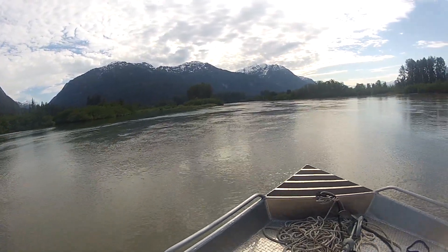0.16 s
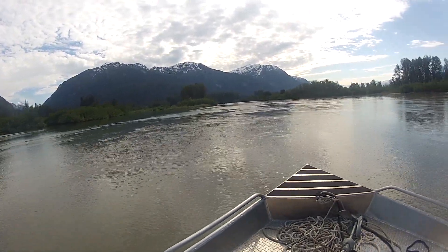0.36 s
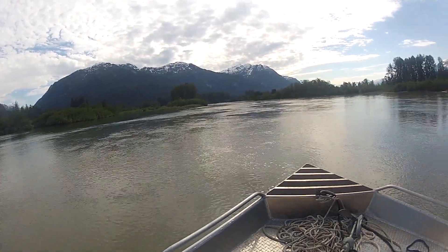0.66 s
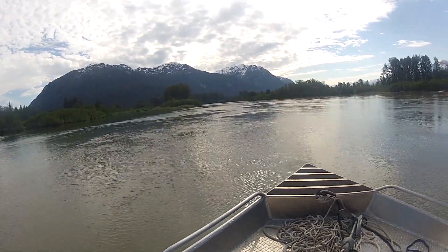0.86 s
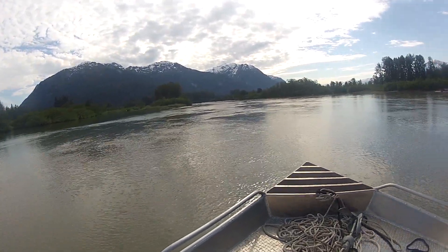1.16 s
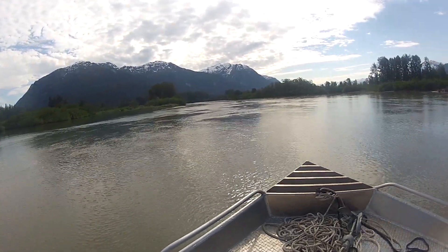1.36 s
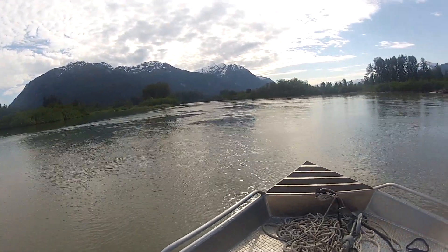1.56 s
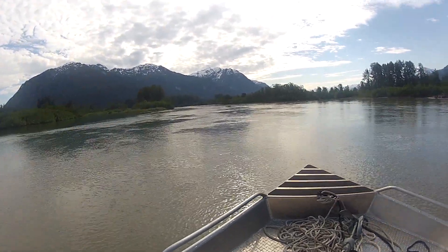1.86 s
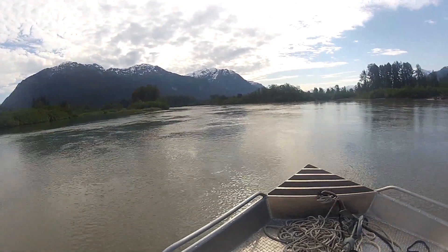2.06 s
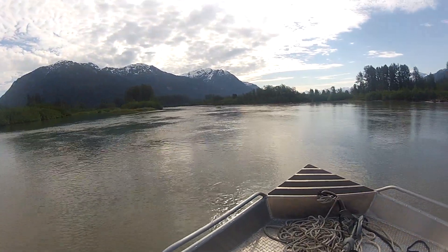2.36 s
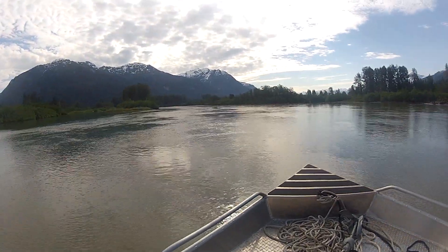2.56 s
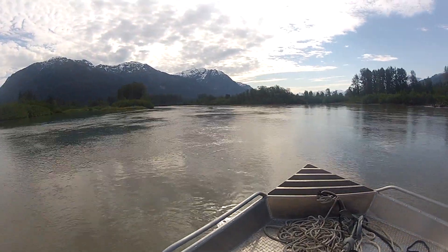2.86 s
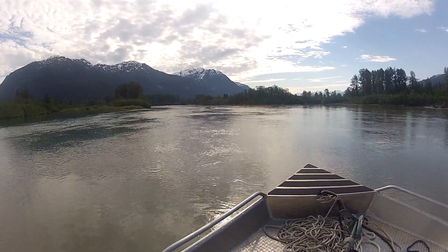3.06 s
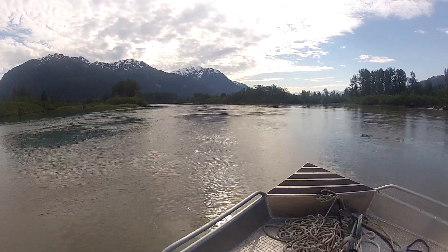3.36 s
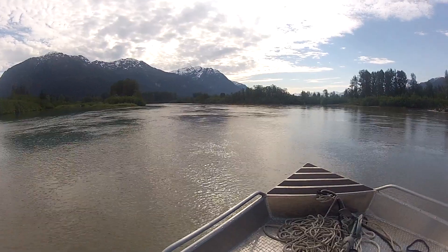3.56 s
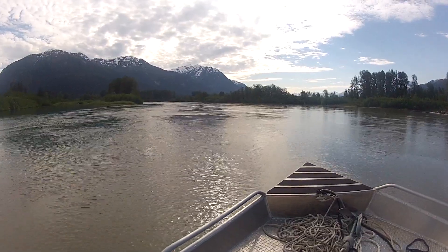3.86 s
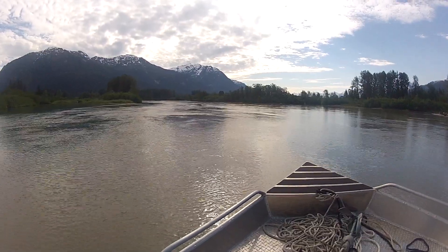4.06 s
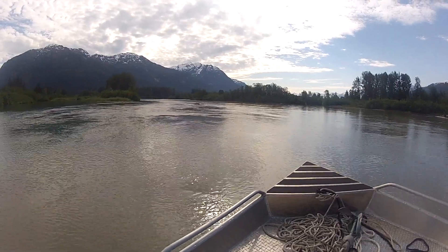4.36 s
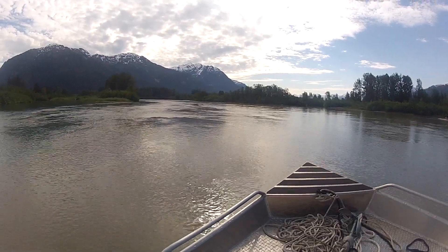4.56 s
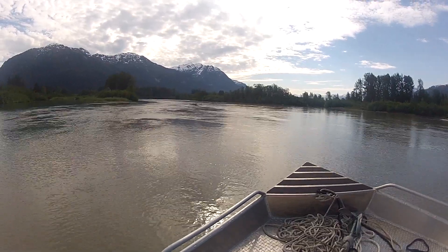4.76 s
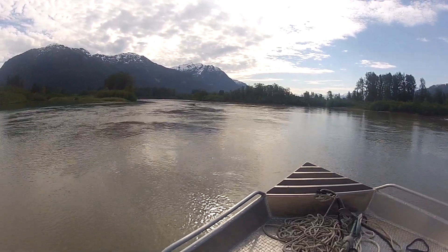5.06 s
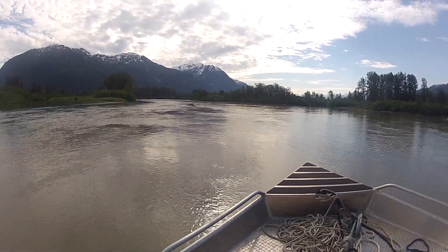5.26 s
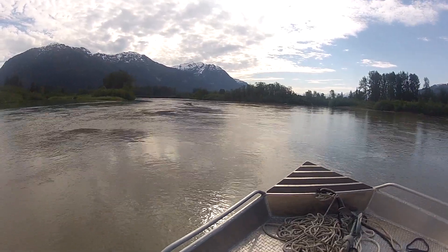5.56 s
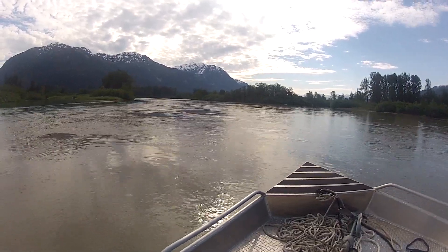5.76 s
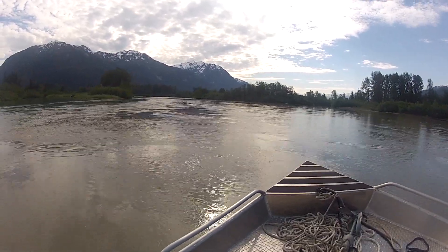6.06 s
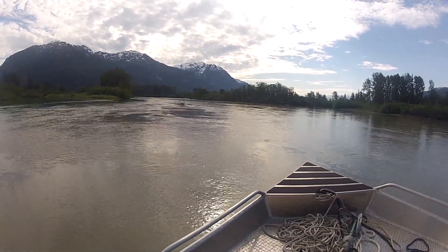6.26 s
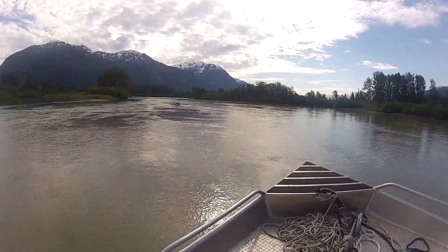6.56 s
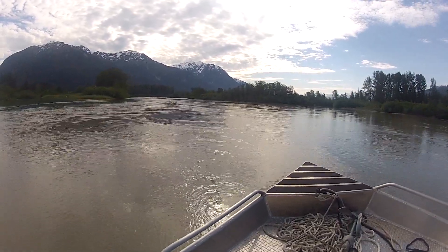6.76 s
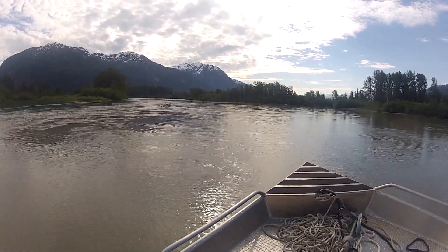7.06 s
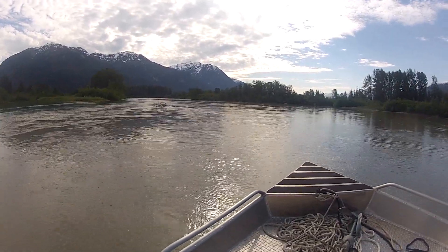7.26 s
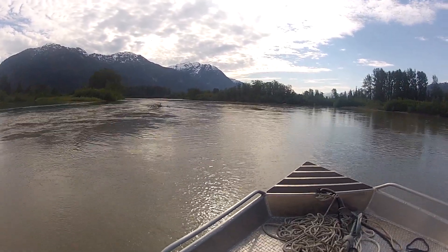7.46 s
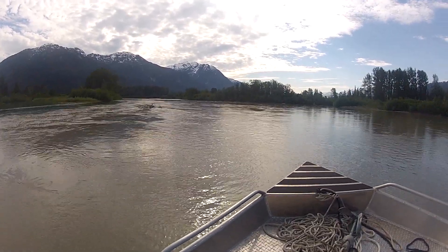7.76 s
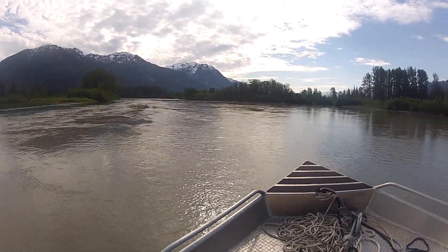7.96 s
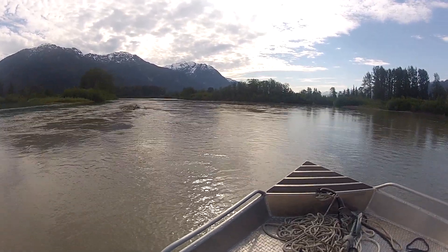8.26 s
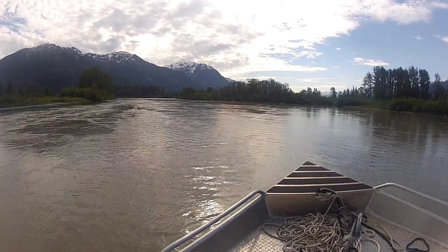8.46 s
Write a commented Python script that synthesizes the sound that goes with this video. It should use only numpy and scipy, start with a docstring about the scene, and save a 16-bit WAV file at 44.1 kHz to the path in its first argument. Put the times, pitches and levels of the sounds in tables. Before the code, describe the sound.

Motorboat cruising a wide river: deep buzzing engine hum, rumbling metal hull, hissing water bursts, occasional slaps, muffled wind, gritty lo-fi treble.

```python
"""An engine drone fills an aluminium jet boat at steady cruise, heard from a small cased camera in the bow.
The drone sums shaft orders, some swelling one by one; noise rings the hull panels under it.
Spray, wash and mist are grainy noises that surge together and burst as the bow lands; waves slap the hull.
Low wind noise buffets the case. A slow converter holds each sample, mirroring the sound into the treble."""
import sys
import numpy as np
from scipy import signal
from scipy.fft import rfft, irfft
from scipy.io import wavfile
from scipy.ndimage import uniform_filter1d

SR = 44100
rng = np.random.default_rng(int(sys.argv[2]) if len(sys.argv) > 2 else 0)


def natural_amplitude(level_db):
    """Convert a level in decibels to a linear amplitude factor, elementwise."""
    exponent = np.asarray(level_db, float) / 20
    return 10 ** exponent


def dump(signal):
    """Clip the signal to [-1, 1] and save it as 16-bit WAV at the path in sys.argv[1]."""
    limited = np.clip(np.atleast_2d(signal).T, -1, 1)
    pcm = np.round(limited * 32767).astype(np.int16)
    wavfile.write(sys.argv[1], SR, pcm)


N = 380583  # samples

# shaft speed: time_s, speed_hz
SHAFT_SPEED = [(0, 34.89), (1.5, 34.82), (3.2, 34.8), (3.7, 34.94), (5.5, 35.0), (8.63, 34.94)]
# orders without swells: multiple_of_shaft_speed, level_db
STEADY_ORDERS = [(2, -48.5), (5, -30.5), (9, -50.5), (26, -68.5), (40, -65)]
# orders that swell and fade: multiple_of_shaft_speed, mid_run_level_db, drift_db_per_s
WAVERING_ORDERS = [(1, -43.5, 1.1), (3, -33, -0.35), (4, -27, 0.), (6, -33, 0.), (7, -33, 0.24),
                   (8, -34, 0.), (10, -49.5, 0.), (11, -51.5, 0.), (12, -51, 0.14), (17, -59.5, 0),
                   (18, -56.5, 0.)]
# swells of single orders as the hull rides the water: multiple_of_shaft_speed, start_s, length_s, change_db
ORDER_SWELLS = [(4, -.2, 0.56, 3.5), (4, 1.3, .9, -11.5), (4, 3, .3, 2.5), (4, 6, 0.27, -5),
                (4, 4.5, 0.93, 4), (4, 5.55, 1.12, -12), (4, 6.6, 0.7, -7), (4, 7.28, 0.37, 3),
                (4, 8, .9, -12.5), (3, -0.13, 3.07, 4), (3, 4.5, 0.56, -6), (3, 4, 0.59, 4),
                (3, 8.5, .35, 4), (6, -0.15, 2.0, -4.5), (6, .85, 0.21, -6), (6, 2, 0.43, 4.5),
                (6, 3.0, 1.32, 4.5), (6, 7.5, .2, -7), (6, 8.0, .7, -10), (7, 1, 0.43, -4),
                (7, 2.5, 0.21, -8), (7, 3.9, 0.27, 4.5), (7, 4.5, 0.2, -8), (7, 5, 0.45, 4),
                (7, 6, .25, -4), (7, 8, 0.45, 3.5), (8, 1.95, 0.48, -7), (8, 3, .9, -6),
                (8, 4.5, 0.99, 2.5), (8, 5.5, .5, -4.5), (8, 7, 0.68, -9), (10, 1.38, 1.5, 6.5),
                (10, 5.3, 0.74, 4), (10, 3, 0.41, -6), (10, 3.38, 0.56, 8), (10, 6, 0.56, -6),
                (11, 2.5, 1.6, -10), (12, 0.6, 2.74, -6.5), (12, 3.5, 1.05, 4.5), (17, 4.5, 3.0, -5),
                (17, 7.5, .8, 6), (18, 7.7, 1.0, 3.5), (17, -0.5, .8, 2.5), (18, 2.0, 2.5, -7),
                (18, -0.3, 0.97, 5)]
# panels that delay the beat: resonance_hz, width_hz
DELAY_PANELS = [(98, 18), (228, 6), (272, 20), (300, 10)]
# hull panels rung by turbulence: resonance_hz, width_hz, level_db
HULL_PANELS = [(95.7, 24.5, -33.5), (165, 67, -39), (235, 36, -35), (349, 94, -50.5), (620, 70, -56),
               (925, 92, -54)]
# how much water flies: time_s, spray_db, mist_db (mist before MIST_GAIN_DB)
WATER_LEVELS = [(0, -49.5, -51.5), (.25, -47, -55.5), (.7, -45, -53.5), (1.4, -43.5, -59.5),
                (1.7, -40.5, -56.5), (2.3, -41, -56), (3.1, -43.5, -56.5), (3.9, -44, -53.5),
                (4.5, -43.5, -52), (5.3, -47, -52.5), (5.8, -41, -56), (6.4, -40, -56.5), (6.8, -37, -55.5),
                (7.25, -37, -55.5), (7.6, -44, -55.5), (7.8, -38, -57), (8.14, -40.5, -61),
                (8.3, -45.5, -60.5), (8.63, -42, -57.5)]
# camera case cavities colouring the spray: resonance_hz, width_hz, relative_level_db
CASE_CAVITIES = [(2167, 490, -3), (2606, 485, 0), (3210, 135, -5)]
# wash spectrum: frequency_hz, relative_density_db
WASH_SPECTRUM = [(300, -19), (420, -8.5), (512, -8), (618, -5), (950, -4), (1160, -9), (1700, -8),
                 (2600, -18.5), (4000, -48)]
# mist spectrum: frequency_hz, relative_density_db
MIST_SPECTRUM = [(600, -33), (1300, -5.5), (2200, 0), (3200, -8.5), (3550, -7), (5220, -13.5),
                 (5900, -24.5), (7000, -50)]
# bow lifts, then lands: landing_s, lift_s, lift_change_db, burst_db
BOW_LANDINGS = [(.29, 0.087, -4, 1.5), (1.52, 0.11, -2.5, 1), (.94, .04, 0, 4), (1.097, 0.096, -5.5, 10.5),
                (1.9, 0.14, -2, 1.5), (2.19, 0.055, -0.5, 6), (2.52, .07, 3.5, 2.5), (2.81, .04, -0.5, 2),
                (3.05, 0.096, -3.5, 3), (3.46, 0.13, -2, 5), (3.7, 0.092, -3.5, 2), (3.77, 0.034, -2, 2),
                (3.92, 0.081, -1, 3.5), (4.4, 0.078, -3.5, 3), (4.76, 0.14, -2, 1), (5.17, .06, -2, 4.5),
                (5.53, 0.057, -0.5, 1.5), (5.878, 0.071, -6.5, 0), (6.12, .05, -3, 5), (6.25, .06, -3, 0.5),
                (6.68, .04, -2, 1.5), (7.01, 0.085, -3, 2.5), (7.35, .06, -3.5, 0.5),
                (7.72, 0.059, -0.5, 1), (8.32, 0.13, -4.5, .5), (8.47, 0.11, -2, 3)]
# waves slapping the hull: start_s, thud_peak_db, thud_hz, splash_start_db
WAVE_SLAPS = [(1.099, -23, 110, -36), (1.758, -9, 103.6, -50), (5.879, -32, 110, -44),
              (6.107, -22, 120, -43.5)]
# wind gusts and lulls: start_s, length_s, change_db
WIND_GUSTS = [(1.25, .4, 5.5), (4.1, 1.6, 6), (5.2, 0.76, 2.5), (1.9, 0.37, 4), (6.35, .2, -10),
              (7.85, .15, 7), (8.2, .2, 2)]

SWELL_EDGE_S, WAVER_DB = 0.14, 0.6
CHURN_ABOVE_HZ, CHURN_DB_PER_MIST_DB = 800, 0.87
MIST_REF_DB, MIST_GAIN_DB = -55, 9.5
WASH_AT_REF_DB, WASH_DB_PER_MIST_DB = -44.5, 0.72
BURST_DECAY_S, LANDING_SMOOTH_S, CHOP_DB = 0.059, 0.0052, 0.75
WIND_DB, GUST_EDGE_S = -40, 0.15


def engine():
    """Shaft orders locked into one beat a turn; uneven combustion makes each flutter in level and phase."""
    speed_hz, = curves(SHAFT_SPEED)
    turn_rad = 2 * np.pi * np.cumsum(speed_hz) / SR + 0.054 * walk(8)
    orders = [(row[0], order_db(*row)) for row in WAVERING_ORDERS] + STEADY_ORDERS
    drone = 0
    for k, level_db in orders:
        slip_rad = 0.02 * k * walk(12) + 0.2 * walk(1.48)
        flutter_db = (0.4 + 0.1 * k) * walk(12)
        wave = np.sqrt(2) * np.cos(k * turn_rad - panel_lag_rad(k) + slip_rad)
        drone = drone + natural_amplitude(level_db + flutter_db) * wave
    return drone, turn_rad


def panel_lag_rad(k):
    """An order lags by up to half a cycle for each panel resonance that it lies above."""
    hz = k * SHAFT_SPEED[0][1]
    return sum(np.arctan2(width_hz * hz, panel_hz ** 2 - hz ** 2) for panel_hz, width_hz in DELAY_PANELS) - 0.7


def order_db(k, mid_run_db, drift_db_per_s):
    """Level of one order: a drift, its swells and a slow waver."""
    swells = [row[1:] for row in ORDER_SWELLS if round(row[0]) == round(k)]
    drift_db = drift_db_per_s * (np.arange(N) - N / 2) / SR
    return mid_run_db + drift_db + bumps(swells, SWELL_EDGE_S) + WAVER_DB * walk(3.5)


def hull():
    """Water rushing under the bottom shakes the panels at random; upper ones ring harder as mist grows."""
    mist_db = curves(WATER_LEVELS)[1]
    churn_db = CHURN_DB_PER_MIST_DB * (mist_db - MIST_REF_DB)
    total = 0
    for hz, width_hz, level_db in HULL_PANELS:
        panel_db = level_db + 1.4 * walk(1.95) + churn_db * (hz > CHURN_ABOVE_HZ)
        total = total + natural_amplitude(panel_db) * ring_twice(rng.standard_normal(N), hz, width_hz)
    return total


def water(turn_rad):
    """Spray, wash and mist surge together and throb once a shaft turn."""
    spray_db, mist_db = curves(WATER_LEVELS)
    wash_db = WASH_AT_REF_DB + WASH_DB_PER_MIST_DB * (mist_db - MIST_REF_DB)
    quick_db = landings_db()
    surge = natural_amplitude(0.5 * walk(25) + 0.5 * walk(70) + 0.37 * np.sin(turn_rad))
    wash, mist = droplets(1.3, count=2)
    # quick spray surges carry over in part
    wash = natural_amplitude(wash_db + 0.41 * quick_db) * colour(wash, WASH_SPECTRUM)
    mist = natural_amplitude(mist_db + MIST_GAIN_DB + 0.43 * quick_db) * colour(mist, MIST_SPECTRUM)
    return surge * (natural_amplitude(spray_db + quick_db) * spray() + wash + mist)


def spray():
    """Droplet noise rings the case cavities, each wavering in level; rms 1."""
    total = 0
    for grains, (hz, width_hz, level_db) in zip(droplets(1.9, count=len(CASE_CAVITIES)), CASE_CAVITIES):
        total = total + natural_amplitude(level_db + 0.3 * walk(9.9)) * ring_twice(grains, hz, width_hz)
    return unit(total)


def droplets(spread_db, count=1):
    """Noises whose grains differ in size together: now and then a big drop."""
    size_db = spread_db * rng.exponential(size=N // 64 + 1).repeat(64)
    size = natural_amplitude(uniform_filter1d(size_db, size=64)[:N])
    return size * rng.standard_normal((count, N))


def landings_db():
    """Spray level around landings: a shift while the bow lifts, usually down, then a burst that decays."""
    t_s, total_db = np.arange(N) / SR, CHOP_DB * walk(14)
    for land_s, lift_s, lift_change_db, burst_db in BOW_LANDINGS:
        # ramps over the first half of the lift, then holds
        before_db = lift_change_db * np.clip(2 + 2 * (t_s - land_s) / lift_s, 0, 1)
        after_db = burst_db * np.exp(-np.abs(t_s - land_s) / BURST_DECAY_S)
        total_db = total_db + np.where(t_s < land_s, before_db, after_db)
    return uniform_filter1d(total_db, size=int(LANDING_SMOOTH_S * SR))


def slaps():
    """Each wave gives a short hull thud and a decaying burst of splash noise."""
    out, t_s = np.zeros(N), np.arange(SR // 8) / SR
    splash = ring(ring(rng.standard_normal(N), 1800.0, 2400.0), 1800.0, 2400.0)
    for start_s, thud_db, thud_hz, splash_db in WAVE_SLAPS:
        i = int(start_s * SR)
        swing = -np.cos(2 * np.pi * thud_hz * (t_s - 0.015))
        thud = swing * np.exp(-((t_s - 0.017) / 0.0095) ** 2)
        burst = np.exp(-t_s / 0.0051) * splash[i:i + len(t_s)]
        out[i:i + len(t_s)] += natural_amplitude(thud_db) * thud + natural_amplitude(splash_db) * burst
    return out


def wind():
    """Low noise buffets the microphone port, in gusts and lulls."""
    buffet = ring(ring(rng.standard_normal(N), 57.0, 80.0), 55.0, 81.0)
    return natural_amplitude(WIND_DB + bumps(WIND_GUSTS, GUST_EDGE_S) + 0.59 * walk(11)) * buffet


def unit(x):
    """Scale to rms 1."""
    return x / np.sqrt(np.mean(x ** 2))


def walk(rate_hz):
    """Random levels held 1 / rate_hz and slewed twice, then trimmed to N; rms 1."""
    k = int(SR / rate_hz)
    steps = np.repeat(rng.standard_normal(N // k + 1), k)
    return unit(uniform_filter1d(uniform_filter1d(steps, k), k)[:N])


def ring(x, hz, width_hz):
    """One resonance, rms 1."""
    return unit(signal.lfilter(*signal.iirpeak(hz, hz / width_hz, fs=SR), x))


def ring_twice(x, hz, width_hz):
    """Steeper resonance: a second pass at twice the width; rms 1."""
    return ring(ring(x, hz, width_hz), hz, 2 * width_hz)


def colour(x, spectrum):
    """Shape a noise by a spectrum, interpolated over log frequency; rms 1."""
    hz, level_db = np.transpose(spectrum)
    bin_hz = np.maximum(np.fft.rfftfreq(N, 1 / SR), 1)
    gain = natural_amplitude(np.interp(np.log(bin_hz), np.log(hz), level_db))
    return unit(irfft(rfft(x) * gain, N))


def curves(table):
    """Columns of a table at every sample; the first column is time_s."""
    time_s, *columns = np.transpose(table)
    return [np.interp(np.arange(N) / SR, time_s, column) for column in columns]


def bumps(rows, edge_s):
    """Sum of soft-edged plateaus: start_s, length_s, change_db."""
    t_s = np.arange(0, N, 64) / SR
    total_db = np.zeros(len(t_s))
    for start_s, length_s, change_db in rows:
        rise = np.tanh(2 * (t_s - start_s) / edge_s)
        fall = np.tanh(2 * (t_s - start_s - length_s) / edge_s)
        total_db += change_db * (rise - fall) / 2
    return np.interp(np.arange(N) / SR, t_s, total_db)


def scene():
    """Engine, hull, water, slaps and wind at one microphone."""
    drone, turn_rad = engine()
    return (drone + hull() + water(turn_rad) + slaps() + wind())[None]


def low_pass(x):
    """Removes everything above the highest recorded frequency."""
    return signal.sosfilt(signal.butter(12, 16500, fs=SR, output="sos"), x)


def record(dry):
    """Sampling at 12 kHz with each sample held four ticks leaves mirror images; the top is cut."""
    slow = signal.resample_poly(dry, 40, 147, axis=1)  # 44.1 to 12 kHz
    held = np.repeat(slow, 4, axis=1)  # 48 kHz
    full = signal.resample_poly(held, 147, 160, axis=1)[:, :N]  # back to 44.1 kHz
    top_cut = signal.ellip(12, 0.2, 50, 15300, fs=SR, output="sos")  # order, ripple dB, stop dB, Hz
    mix = signal.sosfilt(top_cut, full)
    return low_pass(mix)


dry = scene()
out = record(dry)
dump(out)
```